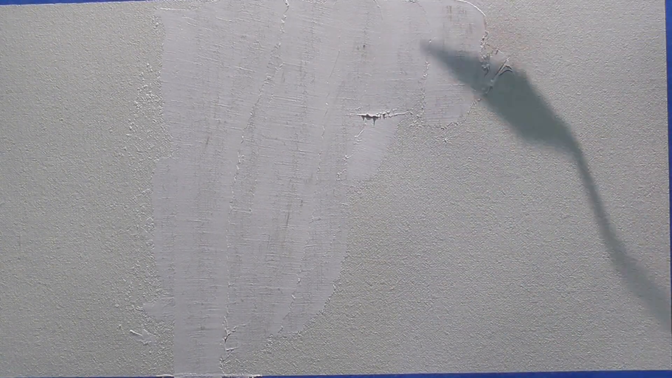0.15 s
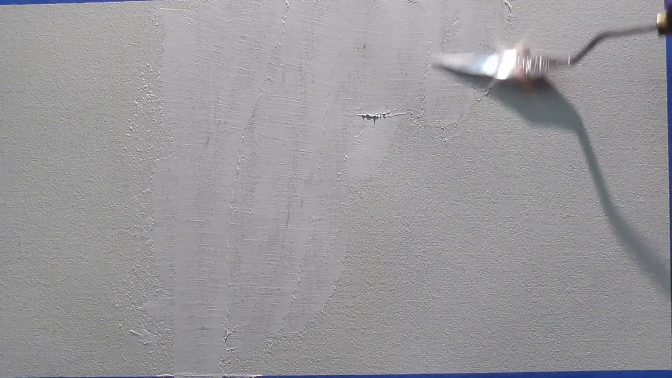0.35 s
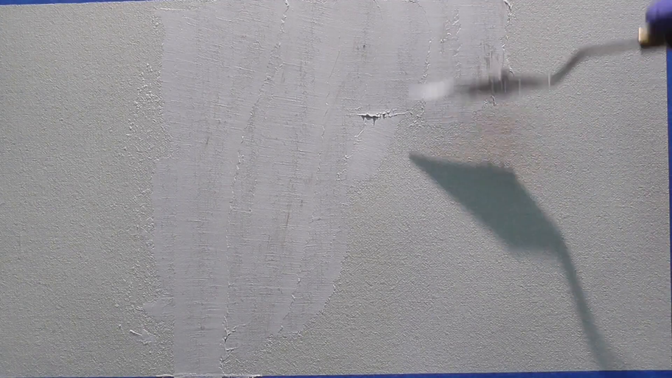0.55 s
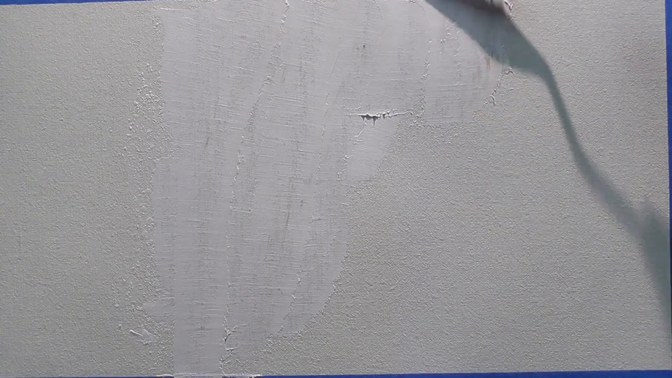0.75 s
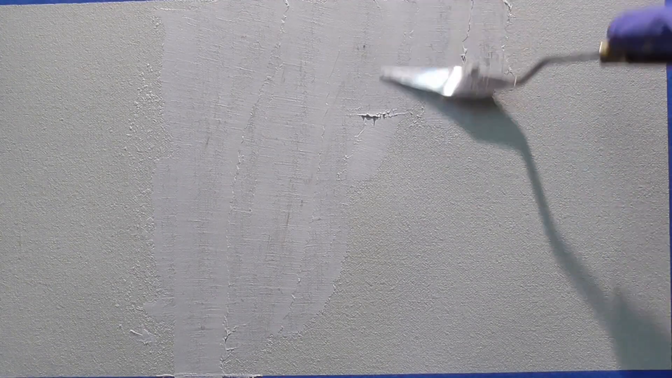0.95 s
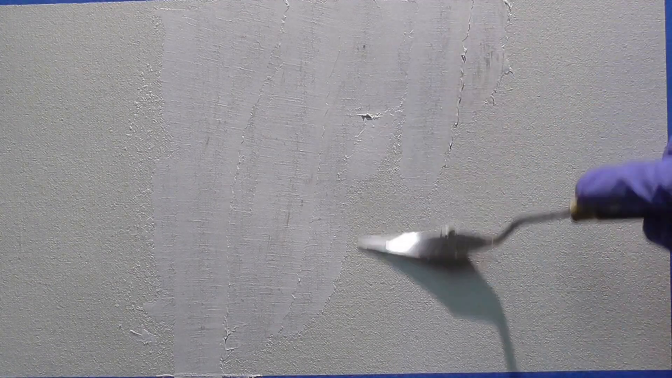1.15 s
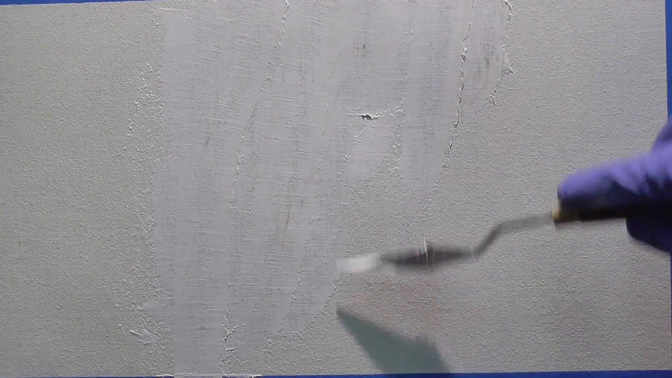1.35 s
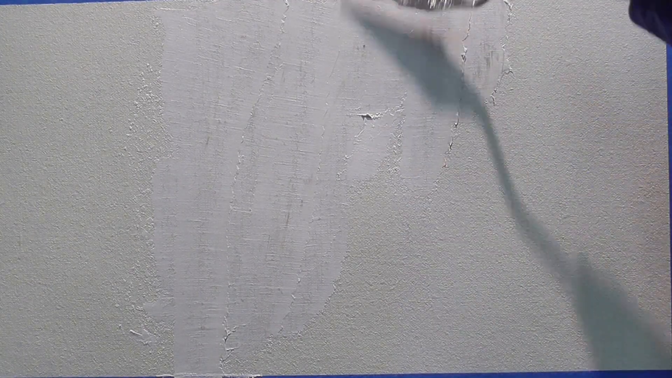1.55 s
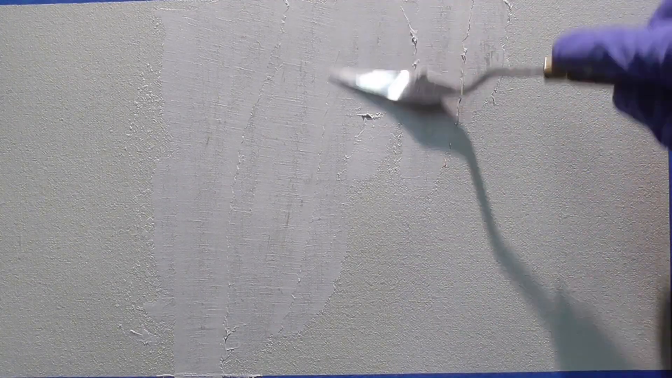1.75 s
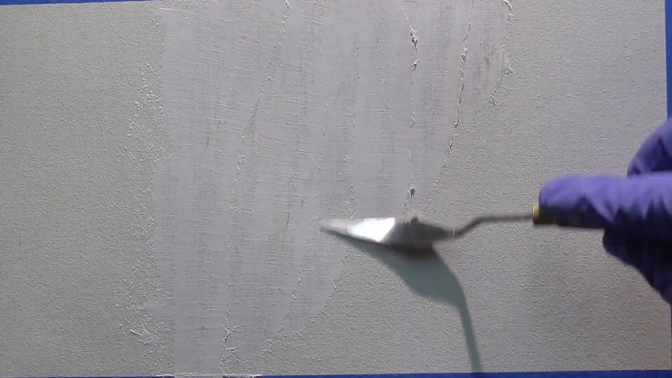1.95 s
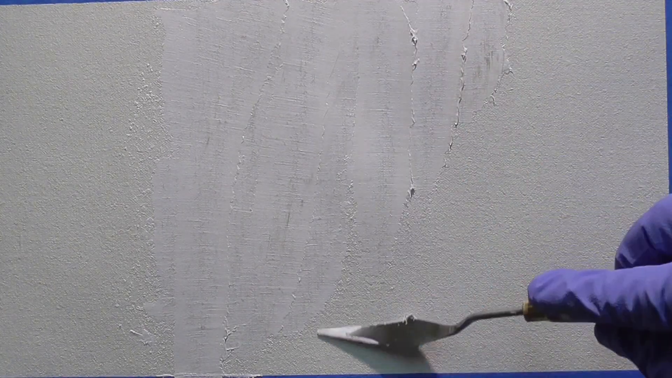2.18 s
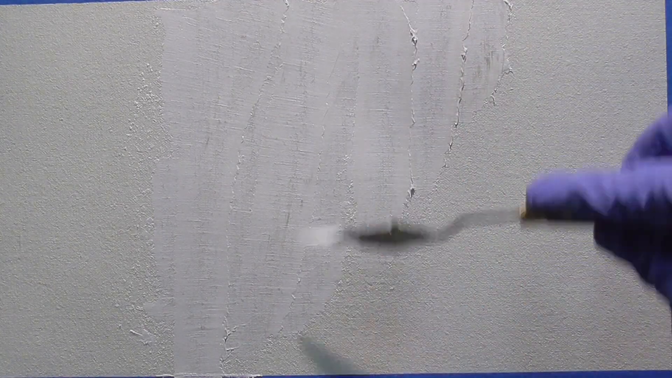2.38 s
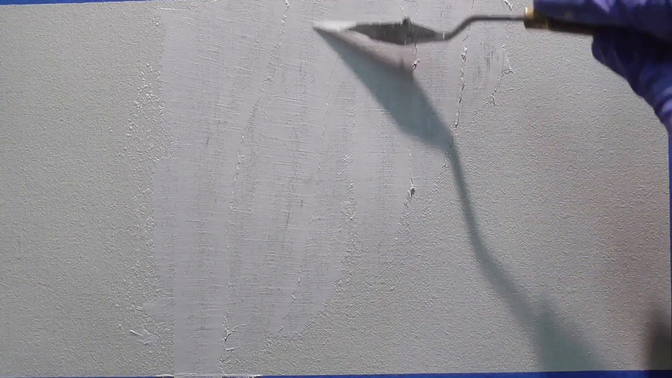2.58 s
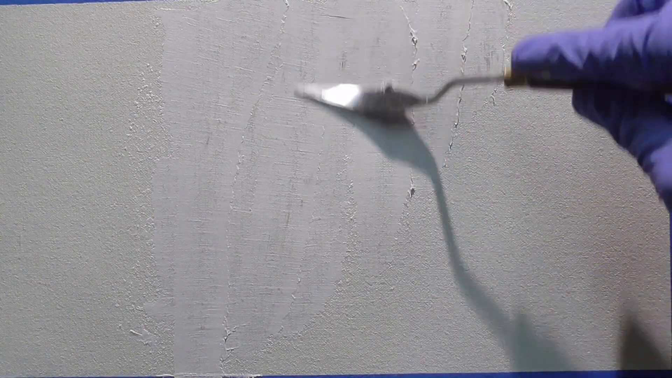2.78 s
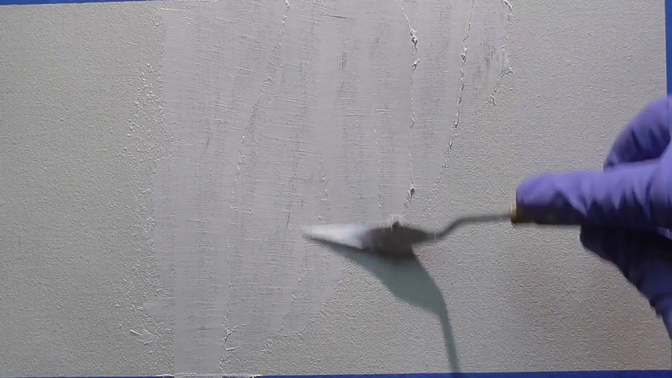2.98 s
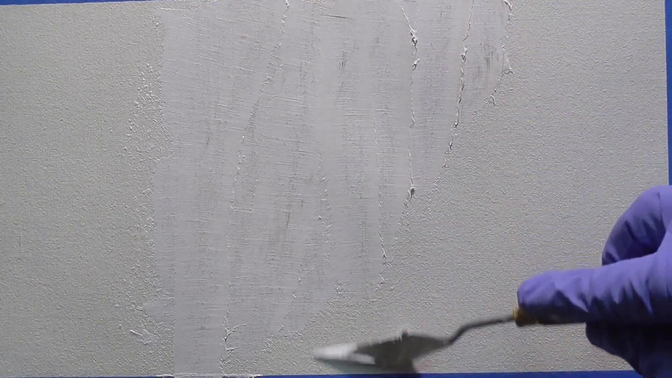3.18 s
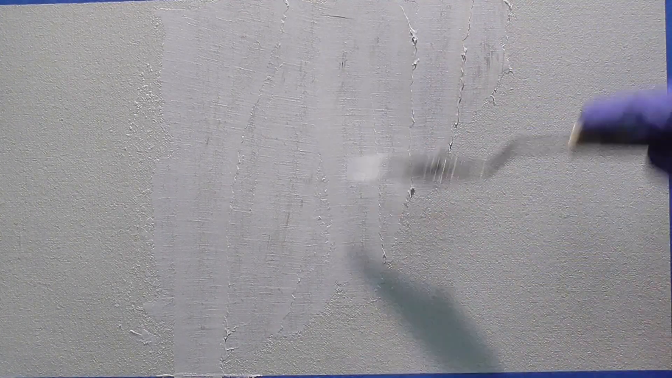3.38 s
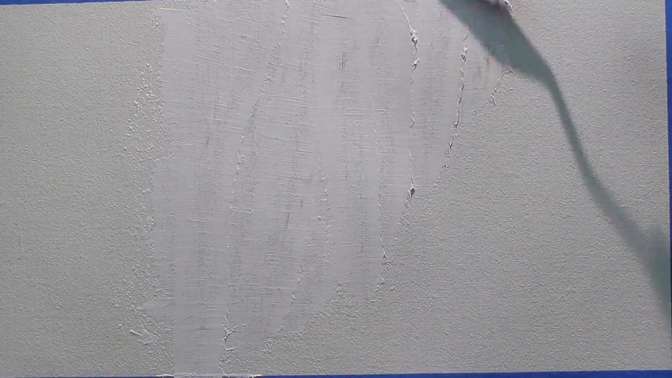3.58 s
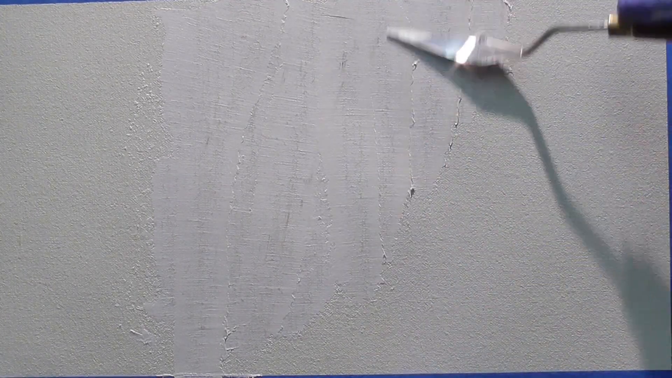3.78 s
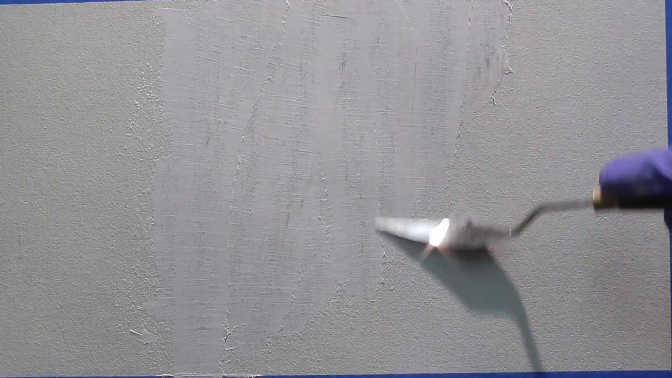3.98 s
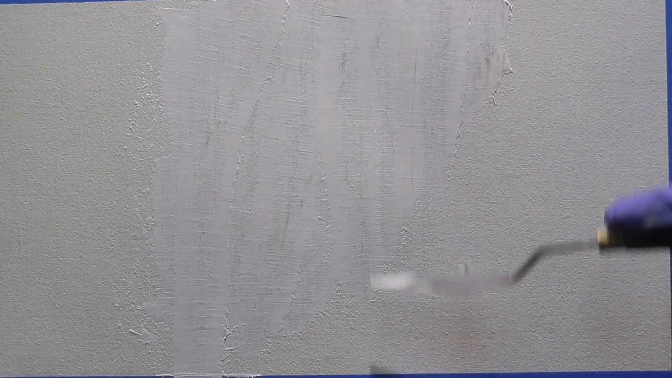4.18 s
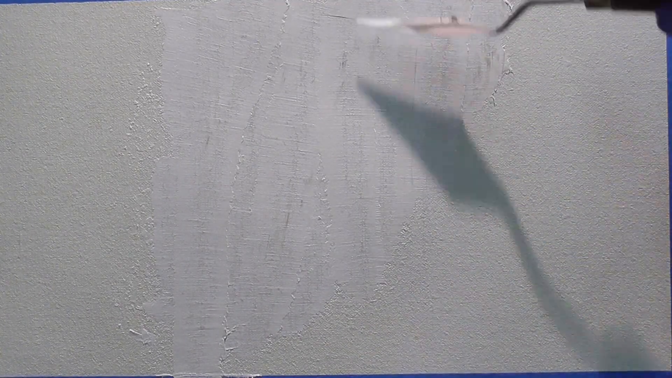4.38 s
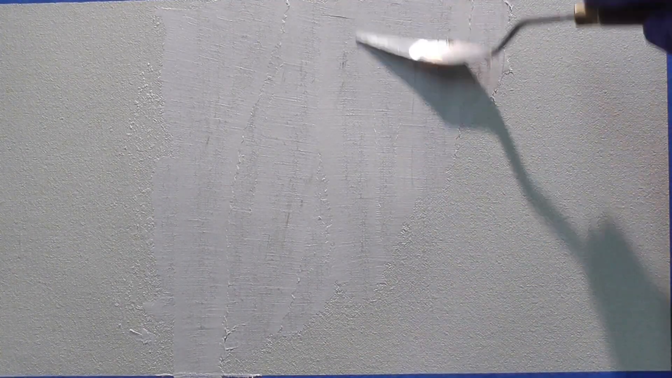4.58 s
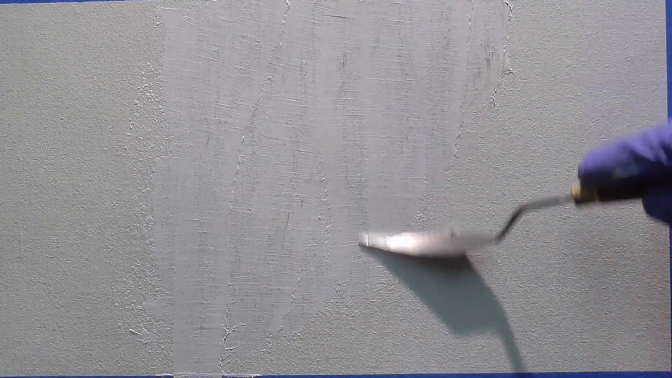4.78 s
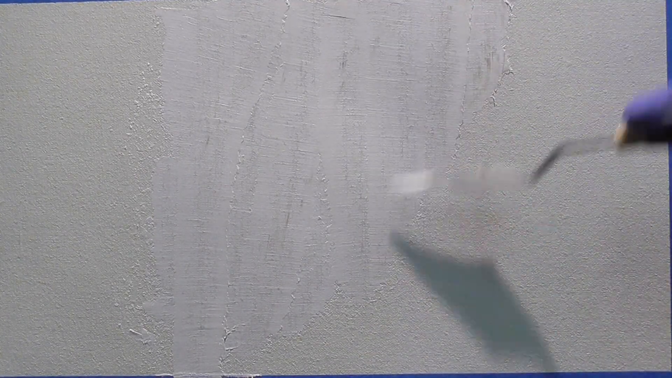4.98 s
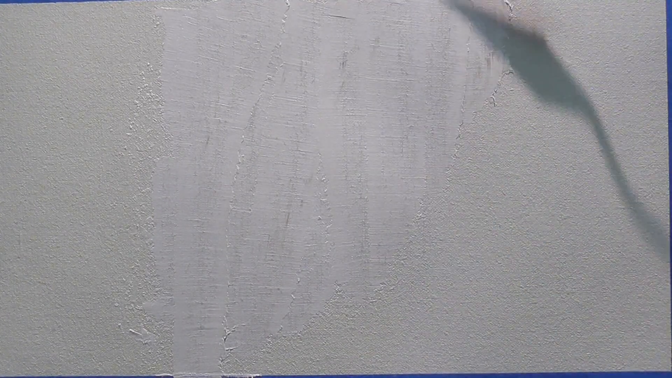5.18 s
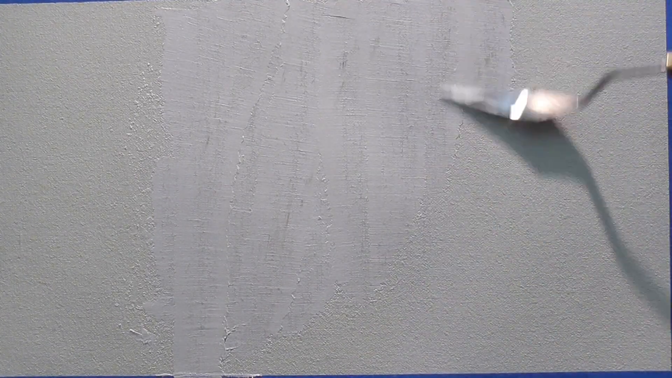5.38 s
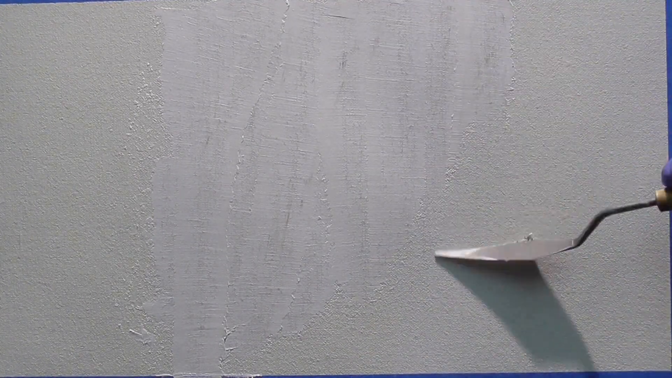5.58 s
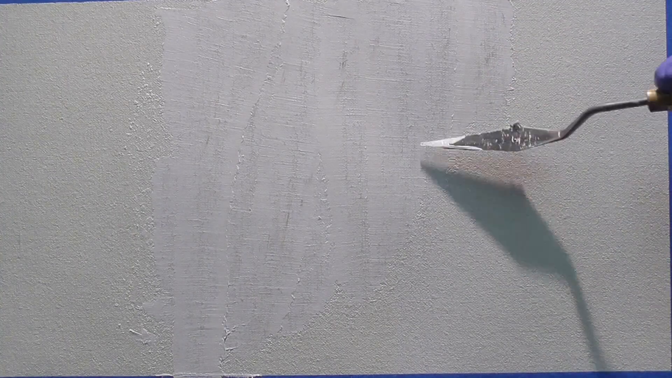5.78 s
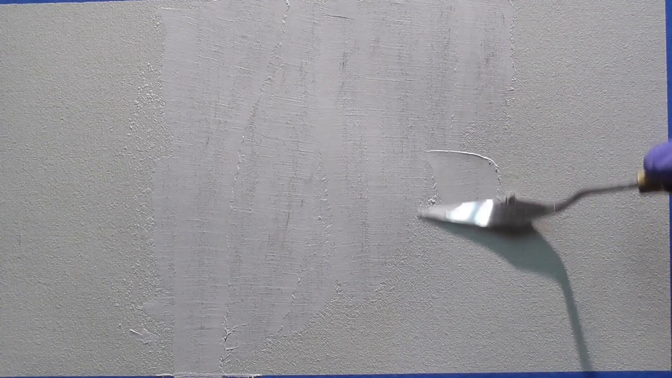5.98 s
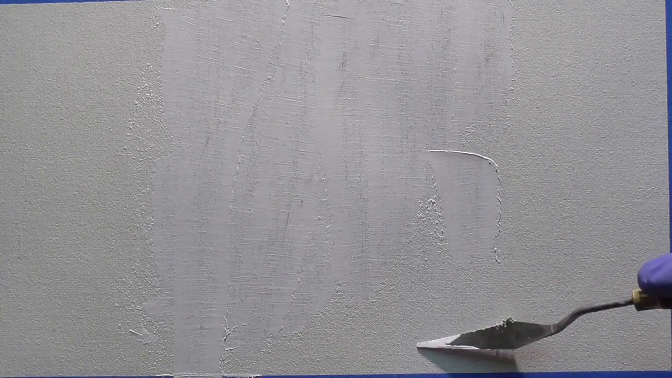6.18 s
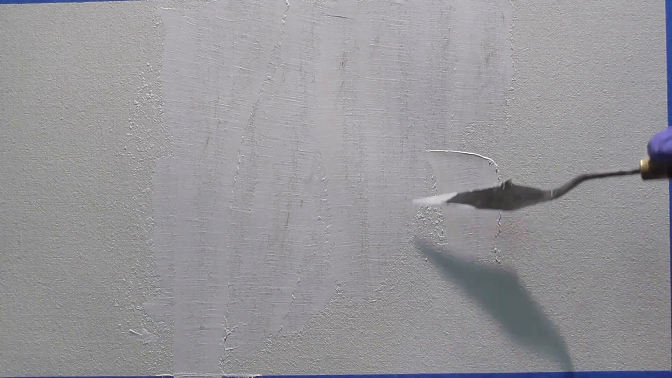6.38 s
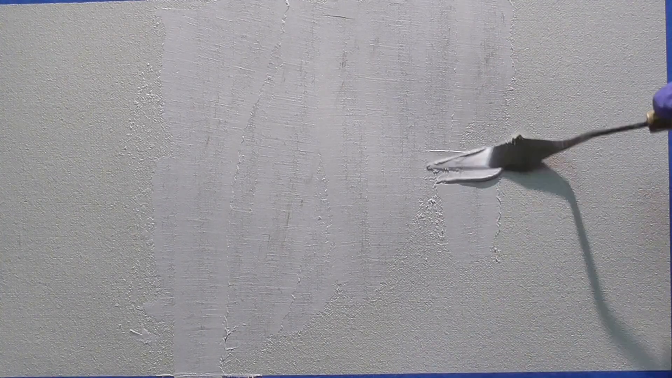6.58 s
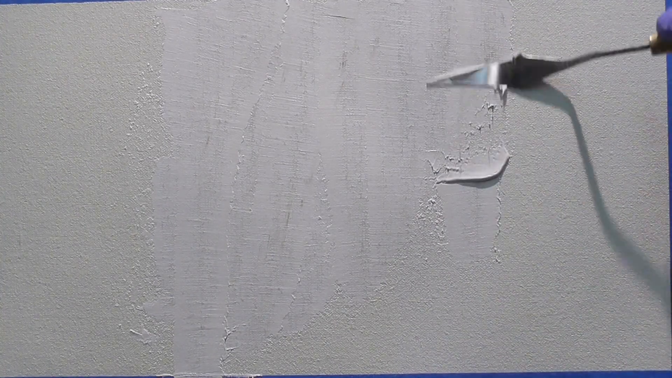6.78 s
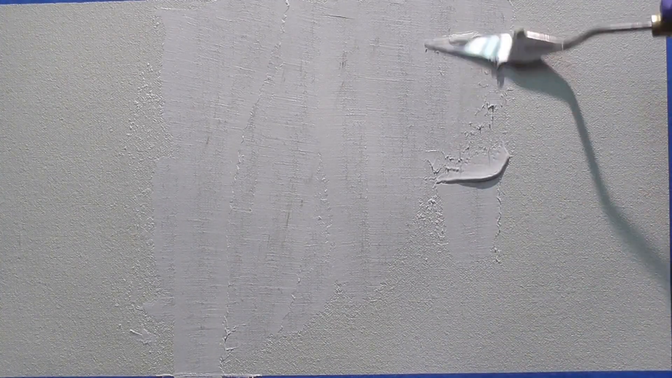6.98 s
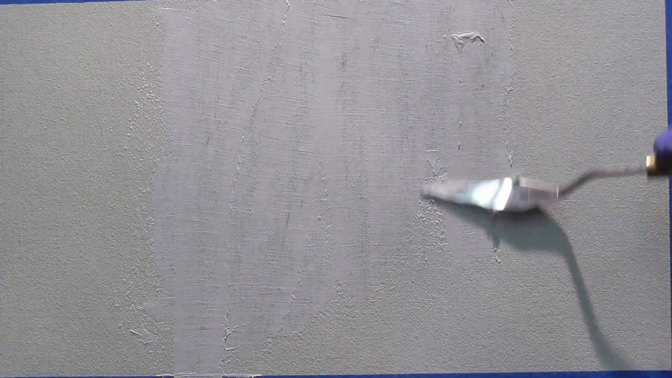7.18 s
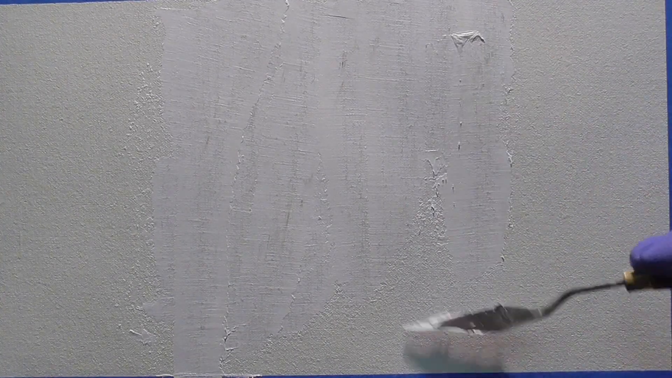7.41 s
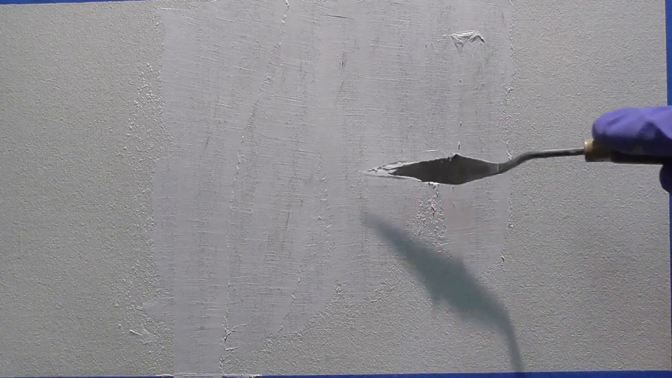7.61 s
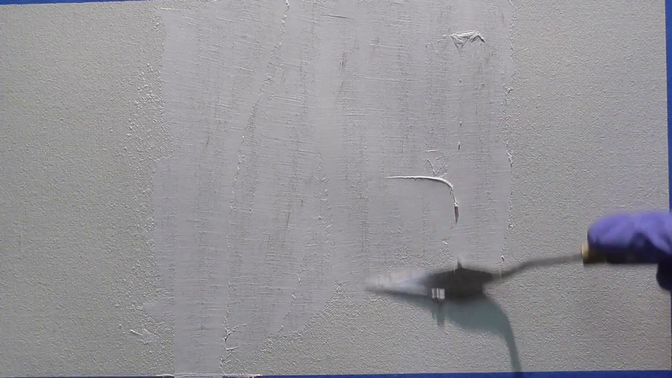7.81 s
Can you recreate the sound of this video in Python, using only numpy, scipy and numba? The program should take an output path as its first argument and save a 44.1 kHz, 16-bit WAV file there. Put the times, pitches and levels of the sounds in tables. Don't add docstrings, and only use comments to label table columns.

```python
import sys
import numpy as np
from scipy import signal
from scipy.fft import rfft, irfft
from scipy.io import wavfile
from scipy.ndimage import uniform_filter1d
from numba import njit

SR = 44100
rng = np.random.default_rng(int(sys.argv[2]) if len(sys.argv) > 2 else 0)


def waveform_to_disk(signal):
    frames = np.transpose(np.atleast_2d(signal))
    scaled = np.clip(frames, -1, 1) * 32767
    samples = np.round(scaled).astype(np.int16)
    wavfile.write(sys.argv[1], SR, samples)


def voltage_ratio(decibels):
    exponent = np.asarray(decibels, float) / 20
    return 10 ** exponent


N = 346185

# pitch_hz, width_hz, level_db
DRUM = [(45, 81, -28), (80, 50, -28.5), (120, 60, -12), (141.4, 22, -7), (206.8, 39.6, 3),
        (235.8, 27, -5.5), (255.7, 26, -8.5), (281.7, 29, -9)]
# pitch_hz, width_hz, level_db
CLOTH = [(319, 65, -6), (373.1, 25, -9), (418.3, 54, -6), (480, 44, -4), (535.7, 73, -11.5), (605.8, 32, 1),
         (751, 98, -13.5), (806.6, 97, -6), (954, 190, -5.5), (1064, 31, -18), (1414, 370, -12)]


@njit
def svf(x, hz, width):
    y = np.empty(len(x))
    band1, low1, band2, low2 = 0., 0., 0., 0.
    for i in range(len(x)):
        g = np.tan(np.pi * hz[i] / SR)
        k = width / hz[i]
        v = (band1 + g * (x[i] - low1)) / (1 + g * (g + k))
        w = (band2 + g * (k * v - low2)) / (1 + g * (g + k))
        band1, low1 = 2 * v - band1, low1 + 2 * g * v
        band2, low2 = 2 * w - band2, low2 + 2 * g * w
        y[i] = k * w
    return y


def unit(x):
    return x / np.sqrt(np.mean(x ** 2))


def smooth(x, k):
    return uniform_filter1d(uniform_filter1d(x, k), k)


def steady(x, hold_s):
    return x / np.sqrt(smooth(x ** 2, int(hold_s * SR)) + 1e-12)


def walk(rate):
    k = int(SR / rate)
    steps = np.repeat(rng.standard_normal(N // k + 1), k)
    return 1.4 * smooth(steps, k)[:N]


def tint(points):
    hz, db = np.transpose(points)
    log_hz = np.log(np.fft.rfftfreq(N, 1 / SR) + 1)
    return voltage_ratio(np.interp(log_hz, np.log(hz), db, left=-80))


def mode(force, hz, width, db):
    return voltage_ratio(db) / np.sqrt(width) * svf(force, hz, 1. * width)


def body(force, modes, drift, patchy_db):
    total = 0
    for hz, width, db in modes:
        total = total + mode(force, hz * (1 + drift * walk(6)), width, db + patchy_db * walk(12))
    return total


def slips(rate, scatter_db, judder_db):
    hit = rng.random(N) < rate / SR
    size = voltage_ratio(scatter_db * rng.exponential(size=N) + judder_db * walk(90))
    return hit * size * rng.standard_normal(N)


def pan(x, left_minus_right_db):
    return x * voltage_ratio(np.array([[left_minus_right_db], [-left_minus_right_db]]) / 2)


def place(x, pan_db, wide_db):
    t = np.arange(int(.02 * SR)) / SR
    smear = rng.standard_normal(len(t)) * np.exp(-t / 0.0023)
    smear = smear / np.sqrt(np.sum(smear ** 2))
    side = voltage_ratio(wide_db) * walk(45) * signal.fftconvolve(x, smear)[:N]
    return pan(x, pan_db) + np.array([side, -side])


def hush():
    # pitch_hz, level_db per Hz
    murmur = [(25, -17), (60, -10.5), (120, -7.5), (200, -2), (310, -7), (790, -13.5), (1150, -8),
              (1350, -8), (1600, -18.5), (3000, -26.5), (4500, -25), (6300, -28.5), (10000, -21),
              (15600, -24.5)]
    hz = np.fft.rfftfreq(N, 1 / SR)
    mid, side = rfft(rng.standard_normal((2, N))) * tint(murmur)
    side = side * np.clip(hz / 700, .3, 1)
    mid, side = irfft(mid, N), irfft(side, N)
    scale = voltage_ratio(-72.5) / np.sqrt(np.mean(mid ** 2))
    return scale * np.array([voltage_ratio(2.0) * (mid + side), voltage_ratio(3.0) * (mid - side)])


def room(x):
    t = np.arange(int(.3 * SR)) / SR
    fade = np.exp(-np.log(1000) * t / 0.15)
    tail = rng.standard_normal((2, len(t))) * fade * (t > .004)
    tail = signal.lfilter([1], [1, -.4], tail)
    tail = tail / np.sqrt(np.sum(tail[0] ** 2))
    return voltage_ratio(-15) * signal.fftconvolve(x, tail, axes=1)[:, :N]


def snags():
    # start_s, peak_db, pitch_hz
    ridges = [(0.086, -31.5, 4260), (0.159, -42, 1890), (0.6053, -28, 4830), (0.6994, -39, 3500),
              (1.3257, -14, 4470), (1.4047, -16, 3850), (1.4246, -19, 4350), (1.4955, -34, 4150),
              (1.522, -35.5, 4340), (2.341, -24, 4800), (2.431, -33.5, 3770), (5.678, -8.5, 5350),
              (5.699, -14, 1880), (5.726, -11.5, 7600)]
    out, t = np.zeros(N + SR), np.arange(SR // 50) / SR
    for start_s, peak_db, pitch_hz in ridges:
        grit = rng.standard_normal(len(t)) * np.exp(-t / 0.0038)
        ring = svf(grit, np.full(len(t), 1. * pitch_hz), 2000.0)
        crunch = svf(grit, np.full(len(t), 5500.), 8000.)
        burst = ring + 0.38 * crunch
        i = int(start_s * SR)
        out[i:i + len(t)] += voltage_ratio(peak_db - 2.0) * burst / np.abs(burst).max()
    return place(out[:N], -.6, -7)


def steel_tick(t, pitch_hz, scuff_db, damping):
    # ratio to tick pitch, width_hz, level_db
    partials = [(0.976, 540, 16.5), (.52, 1260, 1.5), (.7, 1100, 0), (1.68, 1100, -7.5), (1.76, 1100, -8.5)]
    grit = rng.standard_normal(len(t))
    knock = grit * (1 - np.exp(-t / 0.0014)) * (np.exp(-t / 0.0006) + 0.047 * np.exp(-t / 0.013))
    tick = 0
    for ratio, width, db in partials:
        tick = tick + voltage_ratio(db) * svf(knock, np.full(len(t), ratio * pitch_hz), damping * width)
    scuff_shape = (1 - np.exp(-t / 0.0016)) * (np.exp(-t / 0.002) + 0.26 * np.exp(-t / 0.022))
    scuff = svf(grit, np.full(len(t), 3600.), 7000.) * scuff_shape
    steel = tick / np.abs(tick).max() + voltage_ratio(scuff_db) * scuff
    return steel / np.abs(steel).max()


def cloth_thud(t):
    thud = 0
    for hz, width, db in DRUM[2:] + CLOTH[:4]:
        chance_db = 3.7 * rng.standard_normal()
        fade = np.exp(-np.pi * 1.1 * width * t)
        thud = thud + voltage_ratio(db + chance_db) * np.sin(2 * np.pi * hz * t) * fade
    thud = thud * (1 - np.exp(-t / 0.0039)) ** 2
    return thud / np.abs(thud).max()


def landings():
    # start_s, tick_db, pitch_hz, thud_db, left_minus_right_db
    edge_first = [(0.4053, -48.5, 3650, -55, -4), (0.4047, -50, 2530, -75, -5),
                  (0.9516, -39.5, 3720, -52, -3.5), (1.722, -67.5, 4000, -73.5, -1),
                  (1.7476, -66.5, 4200, -78, -6), (1.7721, -36, 3870, -48, -4), (2.79, -37.5, 3470, -55, 7),
                  (2.795, -44, 3330, -47, -13), (2.7997, -43, 5030, -64.5, 0.5),
                  (3.7959, -47.5, 4225, -60.5, -2), (7.8414, -45.5, 1965, -54, 3)]
    # start_s, tick_db, pitch_hz, thud_db, left_minus_right_db
    flat_first = [
        (3.6152, -61.5, 2900, -69, -6),
        (4.6526, -47, 2380, -32.5, -3),
        (4.6652, -49.5, 4270, -33, 3),
        (5.4091, -60.5, 3310, -66, 4),
        (6.1017, -49, 2460, -57, 3),
        (6.6171, -49, 2620, -43.5, -5.5),
        (6.6396, -48, 2670, -42, -4),
    ]
    rows = [(*row, min(-52.5 - row[1], -7.0), 1.) for row in edge_first]
    rows += [(*row, 5.5, 2.6) for row in flat_first]
    out, t = np.zeros((2, N + SR)), np.arange(SR // 4) / SR
    for start_s, tick_db, pitch_hz, thud_db, pan_db, scuff_db, damping in rows:
        steel = voltage_ratio(tick_db + 1.0) * steel_tick(t, pitch_hz, scuff_db, damping)
        thud = voltage_ratio(thud_db - 1.5) * cloth_thud(t)
        i = int(start_s * SR)
        out[:, i:i + len(t)] += pan(steel + thud, pan_db)
    return out[:, :N]


def hand():
    # time_s, pressure_db on the cloth, sliding speed_db
    flicks = [
        [(0.0, -39, -60), (0.048, -37, -53), (0.056, -39, -46), (0.09, -39, -41), (0.168, -38, -49),
         (0.24, -60, -94), (0.3, -81, -94)],
        [(0.43, -73, -80), (0.486, -40, -53), (0.602, -45, -41.5), (0.632, -42, -32.5), (0.66, -41.5, -41),
         (0.776, -71, -99), (0.8, -64, -93)],
        [(3.63, -60, -67.5), (3.642, -78, -91), (3.654, -72, -72), (3.696, -67, -94), (3.738, -78.5, -96),
         (3.778, -72, -96), (3.78, -69, -85)],
        [(6.66, -46.5, -66), (6.704, -55.5, -66.5), (6.776, -52, -73), (6.862, -56.5, -64), (7.044, -70, -81),
         (7.106, -75.5, -75.5), (7.13, -77.5, -92)],
    ]
    # time_s, pressure_db, speed_db
    pulls = [
        [(1.01, -65, -71), (1.056, -40, -57), (1.15, -45, -54.5), (1.17, -38, -56), (1.262, -36.5, -43),
         (1.306, -27.5, -30), (1.41, -33.5, -31.5), (1.484, -36, -42), (1.6, -78, -88.5)],
        [(1.8, -57, -69), (1.858, -51.5, -58.5), (1.928, -49.5, -60), (2.014, -36.5, -47), (2.124, -29, -47),
         (2.332, -29, -45), (2.342, -30, -40), (2.452, -49, -51), (2.52, -65, -102)],
        [(2.85, -60.5, -68), (2.984, -44, -54.5), (3.028, -32.5, -56.5), (3.152, -36.5, -47), (3.226, -29, -47),
         (3.31, -34.5, -45.5), (3.36, -27, -36), (3.418, -42.5, -36), (3.52, -64, -80)],
        [(3.83, -67, -71), (3.87, -52.5, -52.5), (3.95, -33.5, -44.5), (3.966, -32.5, -46.5),
         (4.134, -36.5, -32), (4.248, -29, -27), (4.33, -37, -35), (4.392, -67, -73.5), (4.44, -65, -76)],
    ]
    # time_s, pressure_db, speed_db
    swipes = [
        [(4.71, -49, -75), (4.734, -48, -55), (4.768, -31.5, -40.5), (4.796, -39, -37), (4.934, -31, -29.5),
         (5.028, -35, -34.5), (5.066, -39, -33), (5.1, -49.5, -52), (5.17, -70, -81)],
        [(5.42, -70, -80), (5.478, -41, -52), (5.518, -30.5, -41.5), (5.602, -38.5, -31.5),
         (5.654, -28.5, -26.5), (5.74, -26, -27), (5.792, -35.5, -38.5), (5.83, -49, -60.5), (5.89, -71.5, -77)],
        [(6.02, -67, -72), (6.054, -69, -74.5), (6.138, -41.5, -60.5), (6.166, -43, -60.5), (6.238, -31, -43.5),
         (6.272, -32, -29.5), (6.346, -34.5, -32), (6.382, -41.5, -45.5), (6.45, -65, -78)],
        [(7.165, -59, -80), (7.209, -42.5, -54), (7.315, -29.5, -39), (7.349, -34, -41), (7.429, -33, -41),
         (7.521, -27.5, -30.5), (7.595, -35, -39.5), (7.663, -60, -78.5), (7.68, -65, -73)],
    ]
    # bend pitch start_hz, end_hz, tip ring_db, edge steepness_db, cloth slack_db
    grips = [(4260, 3930, 8, -0.5, -1), (4250, 3800, 5.5, 1.5, -1), (3900, 4340, 2, 1, 3),
             (3650, 4200, 14.5, 1.5, 2.5), (3500, 4200, 8, 1.5, 1), (4100, 4260, 3, -1.5, 7.5),
             (4170, 4240, 3, -1, 1), (4150, 4400, 3.5, -2, -3), (4250, 4400, -1, -1, -3),
             (4150, 3700, -1, 1.5, 3), (4050, 4380, 1, 4, -4), (4150, 4300, 4.5, 2, 0)]
    # bend ring start_db, end_db,
    # low blade modes_db, main upper cloth mode_db, the pair above it_db
    places = [(9.5, 2.5, 2.5, 2.5, 0), (11, -5, 0, 0, -1), (5.5, 1.5, 4.5, 1.5, 3),
              (-2.5, 2.5, 4.5, -0.5, -2), (-3, 4, 3, -2.5, -7), (3.5, 3.5, 3, 1.5, -1),
              (1.5, 5, 1, -2.5, 0.5), (-1, 4, -1, 0.5, 3.5), (4, 3, -1, -1, 1), (-5, 1.5, 4, 4.5, 2),
              (2, 4.5, 1, 1, 1.5), (-2.5, 2, 0.5, 1.5, 2.5)]
    strokes = sorted(list(flicks) + list(pulls) + list(swipes), key=lambda rows: rows[0][0])
    t = np.arange(N) / SR
    time_s, press_db, speed_db = np.transpose(np.concatenate(strokes))
    press_db, speed_db = np.interp(t, time_s, press_db), np.interp(t, time_s, speed_db)
    start, end = np.transpose([(rows[0][0], rows[-1][0]) for rows in strokes])
    which = np.clip(np.searchsorted(start - .008, t) - 1, 0, None)
    progress = np.clip((t - start[which]) / (end - start)[which], 0, 1)
    contact = uniform_filter1d(1. * (t <= end[which]), int(0.017 * SR))
    return press_db, speed_db, progress, contact, np.transpose(grips)[:, which], np.transpose(places)[:, which]


def pressure(press_db, speed_db, progress, steep_db, slack_db):
    keep = np.exp(-1 / (0.015 * SR))
    recent_db = 20 * np.log10(signal.lfilter([1 - keep], [1, -keep], voltage_ratio(speed_db)) + 1e-9)
    cloth_db = -2 + slack_db + 0.37 * press_db + .6 * speed_db
    bite_db = 0.58 * np.clip(recent_db + 44, 0, None) + 7.0 * progress
    edge_db = speed_db - 14.5 + steep_db + bite_db
    return voltage_ratio(np.array([press_db, cloth_db, speed_db, edge_db]))


def cloth_sound(force, speed, high_db, pair_db):
    main = voltage_ratio(high_db) * (2.3 * speed) ** 0.3 * body(force, CLOTH[5:6], 0.0055, 3.0)
    pair = voltage_ratio(pair_db) * body(force, CLOTH[6:8], 0.0049, 2.5)
    weave = body(force, CLOTH[:5], 0.01, 4.0) + (1.8 * speed) ** .3 * (main + pair)
    weave = weave + voltage_ratio(-2.0) * speed ** -.12 * body(force, CLOTH[8:], 0.0031, 3.6)
    return steady(weave, 0.17)


def blade_sound(force, grit, speed, low_db, bend_hz, bend_db):
    # pitch_hz, width_hz, level_db
    modes = [(1978, 220, -5), (2300, 330, -4), (2610, 230, -7), (3080, 150, -7), (3650, 320, -2.5),
             (4630, 51, -8), (5350, 200, -13)]
    # pitch_hz, level_db per Hz
    rasp_colour = [(1100, -23.5), (1400, -12), (1800, -4), (2500, -3), (3300, -1.5), (4300, -0.5),
                   (5000, 4.5), (5600, -14), (6500, -32.5)]
    low = voltage_ratio(low_db) * body(force, modes[:3], .02, 3)
    high = body(force, modes[3:], .02, 3)
    bend = mode(force, bend_hz, 380, bend_db - 2)
    rasp = unit(irfft(grit * tint(rasp_colour), N))
    return steady(voltage_ratio(2.5) * speed ** -.3 * unit(low + high + bend) + rasp, 0.16)


def edge_sound(force, grit, speed, progress, tip_db):
    # pitch_hz, level_db per Hz
    hiss_colour = [(4600, -28.5), (5600, 0.5), (6500, -2.5), (8000, -3.5), (11000, -5.5), (13000, -6),
                   (14500, -15.5), (15600, -27.5)]
    hiss = unit(svf(irfft(grit * tint(hiss_colour), N), 8400 * speed ** .2, 9500.))
    tip_hz = (6700 + (7680 - 6700) * progress) * (1 + 0.044 * walk(9))
    ring_db = tip_db - 13.5 - 14.0 * (progress - .62) ** 2 + 4.1 * walk(14)
    tip = voltage_ratio(ring_db) * speed ** -.3 * unit(svf(force, tip_hz, 1000.0))
    return steady(hiss + tip, 0.098)


def scrape():
    press_db, speed_db, progress, contact, grip, spot = hand()
    start_hz, end_hz, tip_db, steep_db, slack_db = grip
    first_db, last_db, low_db, high_db, pair_db = spot
    gains = pressure(press_db, speed_db, progress, steep_db, slack_db) * contact
    drum_gain, cloth_gain, blade_gain, edge_gain = gains
    bend_hz = start_hz + (end_hz - start_hz) * progress
    bend_db = first_db + (last_db - first_db) * progress
    force = slips(rate=8000, scatter_db=1.5, judder_db=1.5)
    grit = rfft(slips(rate=12000, scatter_db=2.0, judder_db=1.0))
    speed = np.clip(edge_gain / (blade_gain + 1e-9), .03, 1.5)
    drum = drum_gain * steady(body(force, DRUM, 0.013, 1.6), 0.048)
    cloth = cloth_gain * cloth_sound(force, speed, high_db, pair_db)
    blade = blade_gain * blade_sound(force, grit, speed, low_db, bend_hz, bend_db)
    edge = edge_gain * edge_sound(force, grit, speed, progress, tip_db)
    low = place(drum, -5.0, -27.5) + place(cloth, -2.5, -10.0)
    return low + place(blade, -.4, -8.0) + place(edge, -1.6, -2.9)


def scene():
    near = scrape() + landings() + snags()
    return near + room(near) + hush()


def band_limit(x):
    return signal.sosfilt(signal.butter(12, 15690, fs=SR, output="sos"), x)


def record(dry):
    band = signal.butter(N=2, Wn=[45, 15000], btype="band", fs=SR, output="sos")
    return band_limit(signal.sosfilt(band, dry))


dry = scene()
out = record(dry)
waveform_to_disk(out)
```